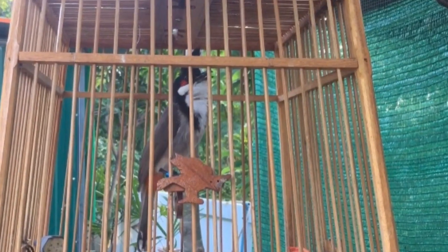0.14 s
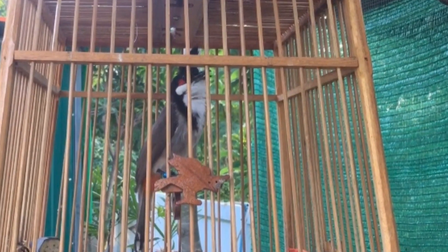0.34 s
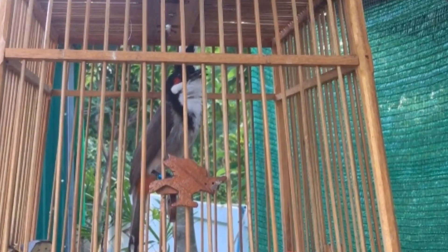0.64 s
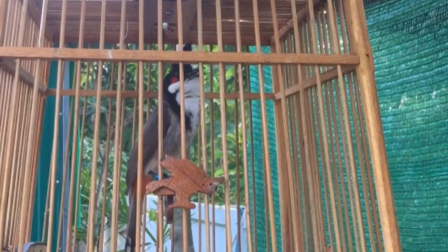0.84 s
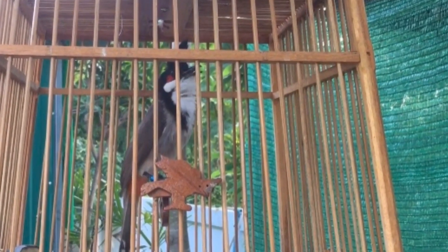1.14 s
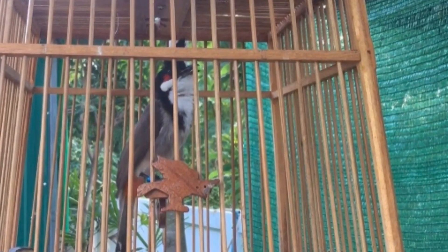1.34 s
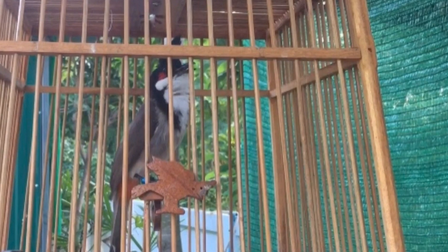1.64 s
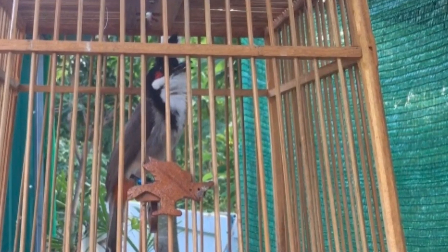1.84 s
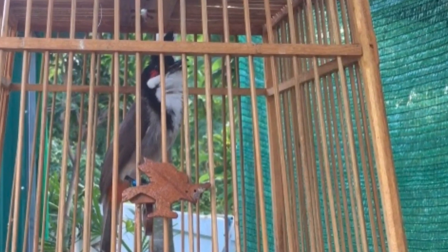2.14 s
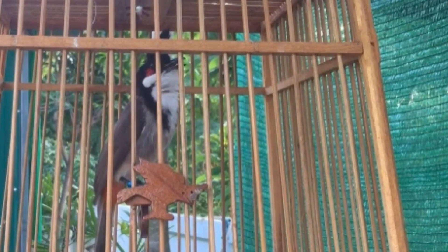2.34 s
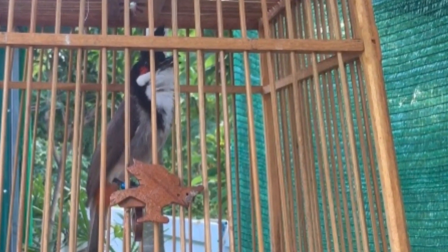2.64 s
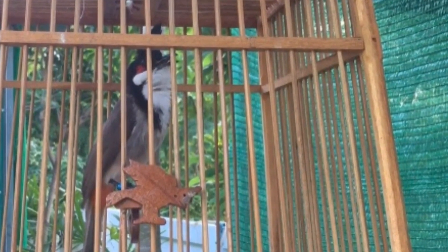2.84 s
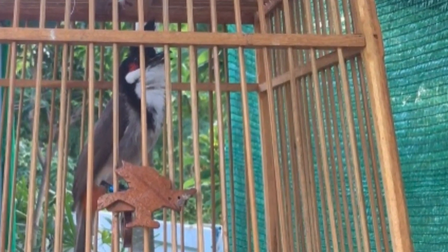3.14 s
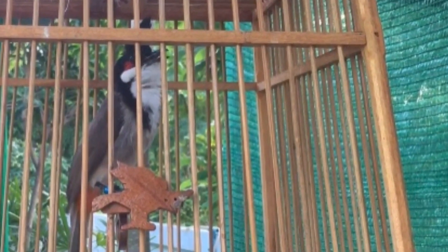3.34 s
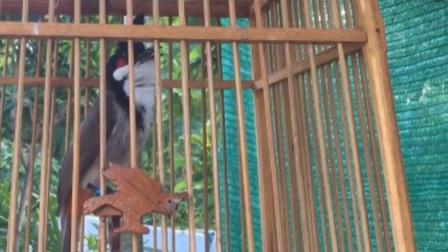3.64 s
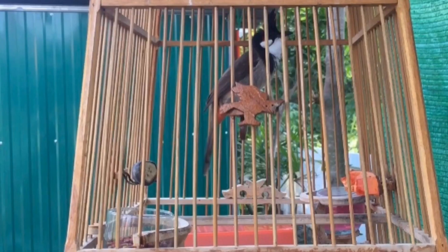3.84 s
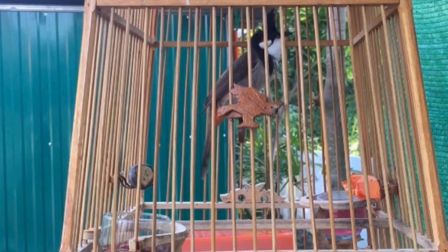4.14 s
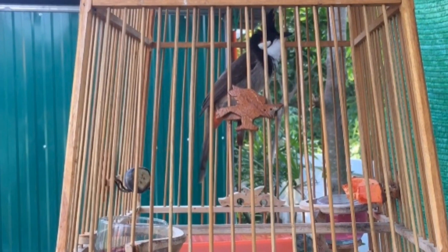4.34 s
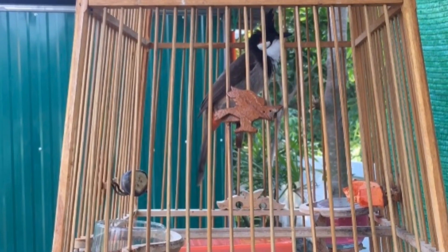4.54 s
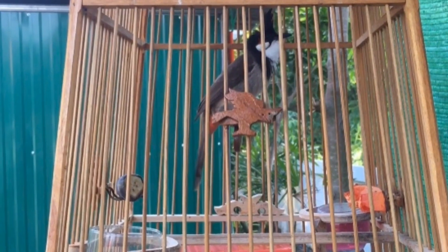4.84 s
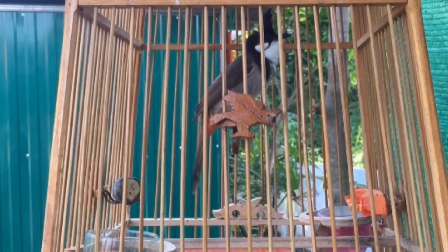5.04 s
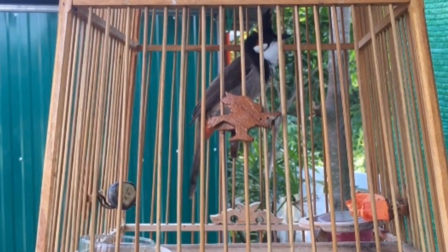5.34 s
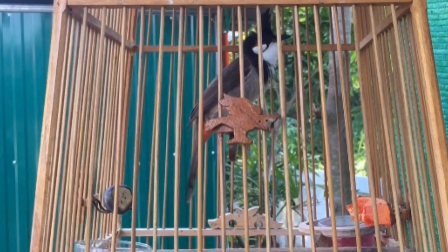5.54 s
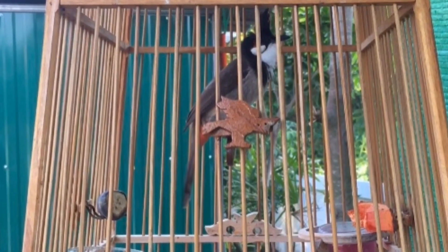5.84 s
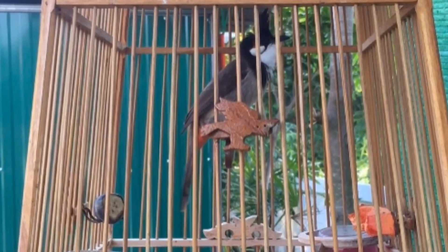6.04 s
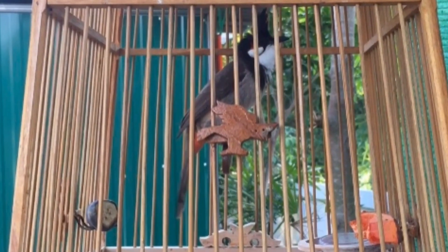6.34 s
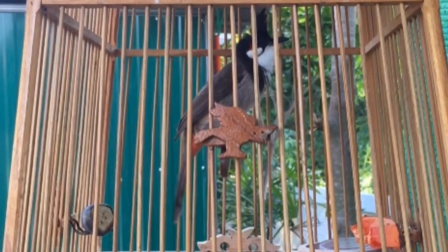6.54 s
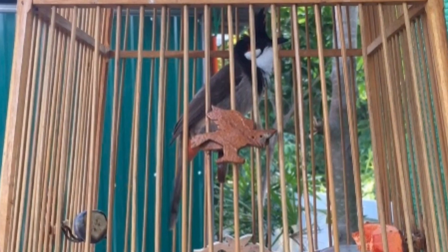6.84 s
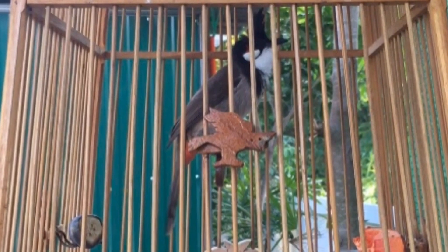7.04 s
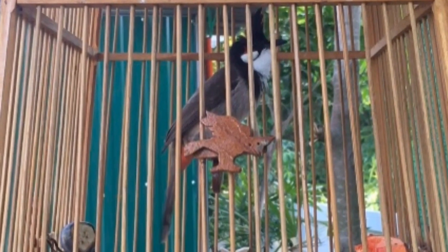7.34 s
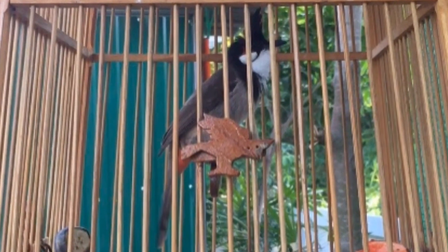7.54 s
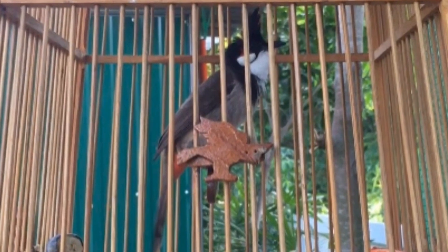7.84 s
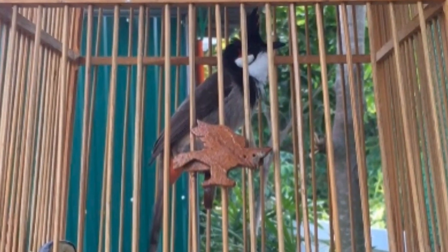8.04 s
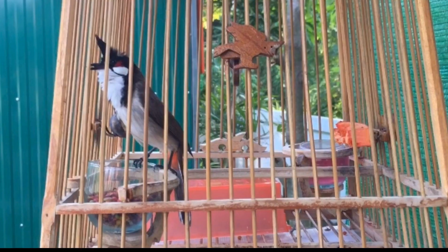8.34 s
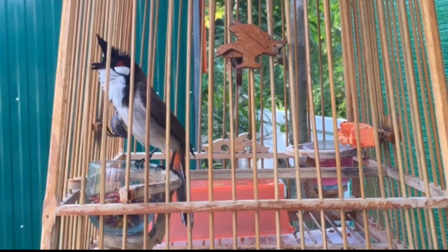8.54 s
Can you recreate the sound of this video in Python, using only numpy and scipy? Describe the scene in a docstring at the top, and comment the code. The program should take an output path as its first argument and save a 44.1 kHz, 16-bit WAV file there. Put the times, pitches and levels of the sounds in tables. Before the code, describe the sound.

A caged songbird very close to the microphone opens with three loud, quick liquid whistles. Three low, wavy, throaty chuckles follow at widely spaced moments, then a longer five-note whistled phrase, and a last chuckle begins right at the end. Tiny bamboo ticks and rustles come from the cage. Other birds reply faintly in the yard, over surging low traffic rumble.

```python
"""A yard where a caged bulbul sings close to the microphone: a low wavy chuckle, given four times, and two
phrases of loud warbled whistles. Whistles are near-pure gliding tones; chuckles are harmonics shaped by a throat.
Cage and yard echo the song, and its loudest notes overload the recorder. One bird answers nearby with trills,
another far off with short glides. The cage ticks (bright snaps over ringing bamboo) and rustles, all in noise.
Distant traffic is surging low noise with a wandering drone, tyre noise and a faint hiss."""
import sys
import numpy as np
from scipy import signal
from scipy.fft import rfft, irfft, next_fast_len
from scipy.io import wavfile
from scipy.ndimage import map_coordinates

SR = 44100
rng = np.random.default_rng(int(sys.argv[2]) if len(sys.argv) > 2 else 0)


def transcribe(signal):
    """Save signal, clipped to [-1, 1], as a 16-bit WAV file at the path in sys.argv[1]."""
    frames = np.atleast_2d(signal).T
    limited = np.clip(frames, -1, 1)
    pcm = np.round(limited * 32767).astype(np.int16)
    wavfile.write(sys.argv[1], SR, pcm)


N = 382347

TOP_HZ = 15750  # nothing sounds above this
ATTACK_S, RELEASE_S = 0.0027, 0.005  # opening and closing of every whistle, chuckle and chip

# The bulbul's five whistles by name, before each note's own gain and pitch ratio:
# (time in note [s], pitch [Hz], level [dB], warble depth [Hz])
WHISTLE_SHAPES = dict( peak=[(0, 1750, -31, -0.5), (.007, 2300, -18, 61), (.013, 3000, -5.5, 379),
                  (.022, 3310, -3, 399.5), (.028, 3417, -0.5, 1.5), (.046, 3260, 2.5, 0),
                  (.054, 3390, -13.5, 449.5), (.063, 3640, 0.5, 220.5), (.076, 3630, -19, 1)],
                  flat=[(0, 3340, -10.5, -0.5), (.006, 2069, -11.5, 0), (.017, 2268, -5, 80),
                  (.036, 2540, -6, 249), (.052, 2660, -5.5, 168.5), (.063, 2480, -3.5, 82)],
                  arch=[(0, 1280, -27, 101), (.018, 1710, -12, 220.5), (.044, 2463, -5, 299),
                  (.060, 2555, -3.5, 301), (.068, 2394, -2, 31), (.084, 2235, -6, 1.5),
                  (.089, 1812, -6.5, 1), (.120, 1881, -13, -1)], buzz=[(0, 1790, -30.5, 300),
                  (.023, 1934, -17, 330), (.038, 2395, -1, 345), (.059, 2720, 3, 280),
                  (.069, 2598, -7.5, 80)], rise=[(0, 1090, -27.5, 0), (.008, 1496, -10.5, 1),
                  (.015, 2250, -9, 0), (.023, 2394, 1, -1), (.031, 2320, 4.5, 30), (.036, 2802, 3.5, 260),
                  (.056, 3327, 4, 89.5), (.079, 3460, 3, 48), (.088, 3026, -5, 0)])
# Its two phrases: (time [s], whistle [name], gain [dB], pitch [ratio], hoarse onset [0-1], warble rate [Hz])
SONG = [(0.0126, "peak", 2, 1.0, .08, 92), (.162, "flat", -1, 1.0, 0.1, 94.9),
        (.277, "arch", -2.5, 1.016, .07, 91.2), (5.863, "buzz", -1.5, 1.052, .8, 104.9),
        (6.173, "rise", -2.5, 1.0132, .09, 94.66), (6.322, "peak", 0.5, 1.0, 0.09, 92.7),
        (6.465, "flat", -1, 0.99, .06, 101.5), (6.582, "arch", -1, 1.022, .07, 96.05)]
# What the throat lets through of overtones and rasp, resonant near 13 kHz: (frequency [Hz], gain [dB])
OVERTONES = [(3300, -25.5), (4300, -31.5), (5400, -28.5), (6200, -32.5), (7300, -32), (8600, -38.5),
             (10400, -48), (11700, -36.5), (13300, -31), (14700, -40), (15700, -36)]
# The chuckle climbs in four arches of pitch and drops at the end, before each one's own gain, pitch and length:
# (time in chuckle [s], pitch [Hz], level [dB])
CHUCKLE_SHAPE = [(0, 1230, -27), (.012, 1360, -14), (.026, 1122, -11.5), (.046, 1564, -10.5),
                 (.067, 1419, -8.5), (.087, 1733, -11.5), (.106, 1590, -10), (.127, 1745, -10),
                 (.151, 1029, -9)]
# Each chuckle: (time [s], gain [dB], overtones [dB], start pitch [ratio], end pitch [ratio],
# length [ratio], pressure [0-1])
CHUCKLES = [(2.213, -0.5, 0, 1.03, 0.97, .945, 0.94), (3.521, -1, 0.5, .955, .99, .955, 1),
            (4.945, -1.5, 1, 1.04, 1.057, 1.06, 1), (8.466, 1.5, -4, .985, .995, 1.0, .35)]
# The throat during a chuckle: (frequency [Hz], gain [dB])
THROAT = [(1000, -20.5), (1300, -11), (1480, -6.5), (1650, 1), (2300, -4), (2900, -7.5), (3200, -20),
          (3500, -23.5), (5000, -38), (7000, -39.5), (10500, -49.5), (13000, -32.5), (16000, -45.5)]
# Husky noise of the chuckle: (frequency [Hz], level [dB])
HUSK = [(1200, -32), (2200, -2.5), (2800, -5), (3600, -10.5), (4300, -37), (5500, -80)]
# Bars, roof and floor of the cage reflect the song: (delay [s], gain [dB])
WALLS = [(.0013, -23.5), (.0029, -17.5), (.0047, -16.5), (.0083, -19)]
# Small knocks on the cage: (time [s], level [dB], extra woody body [dB])
TICKS = [(0.5399, -38, 3), (0.8712, -42, 2), (1.7774, -35, 12), (1.9595, -41.5, 10), (2.6563, -41.5, 11.5),
         (5.697, -37, -12.5), (5.7569, -40.5, -3.5), (6.0366, -34.5, -23), (7.099, -43.5, -4),
         (7.3432, -33.5, 8), (7.4025, -40, -10.5)]
# Colour of snaps and rustles: (frequency [Hz], level [dB])
TICK_COLOUR = [(1500, -6), (3500, 2.5), (6000, -9), (10000, -8), (15000, -4)]
# Ringing modes of the bamboo: (centre [Hz], width [Hz], gain [dB])
BAMBOO = [(950, 260, 3), (1810, 860, -8), (2806, 600, -15.5)]
# Echo decay in the cage: (frequency [Hz], time to fall 60 dB [s])
CAGE_DECAY = [(500, 0.19), (3000, 0.17), (7000, 0.072), (14000, 0.033)]
# Echo decay in the yard: (frequency [Hz], time to fall 60 dB [s])
YARD_DECAY = [(500, 0.18), (2500, 0.68), (4000, 0.49), (7000, .4), (14000, 0.39)]
# Colour of both echoes: (frequency [Hz], gain [dB])
ECHO_COLOUR = [(1000, 0.5), (1650, -1), (1880, 4), (2150, 1), (2500, -2), (4000, -3.5), (6000, 0),
               (14000, -4.5)]
# The neighbour's chip, a rising trill then a downward flick, before each chip's own gain and pitch ratio:
# (time in chip [s], pitch [Hz], level [dB], warble depth [Hz])
CHIP_SHAPE = [(0, 2693, -22, 57), (.018, 2920, -18, 191), (.045, 3427, -14.5, 300),
              (.072, 3905, -19.5, 372), (.088, 3900, -24.5, 244), (.113, 3150, -23, 0),
              (.120, 2496, -20, 4), (.138, 1361, -31, 4)]
# Its chips: (time [s], gain [dB], pitch [ratio])
CHIPS = [(2.403, -4, 1.058), (4.985, -5.5, .93), (7.987, -7.5, .97)]
# The far bird's motifs by name, before each call's own gain and pitch ratio:
# (time in motif [s], pitch [Hz], glide [octaves], level [dB])
FAR_MOTIFS = dict( climb=[(0, 2567, 0.18, -5), (.035, 3265, 0.092, -8.5), (.075, 3530, .02, 2.5)],
              turn=[(0, 2374, -.04, -1), (.1, 3210, 0.045, -2), (.21, 2920, -.03, 0.5)],
              pair=[(0, 2435, -0.037, -1), (.135, 2822, .02, -1.5)], fall=[(0.0049, 2900, -0.19, -4)])
# Its calls: (time [s], motif [name], gain [dB], pitch [ratio])
FAR_CALLS = [(.915, "climb", -38.5, 1.01), (1.39, "climb", -35, .98), (1.645, "pair", -47, 1.0),
             (3.0, "climb", -56.5, .92), (3.235, "turn", -47.5, .99), (5.16, "climb", -38.5, 1.047),
             (5.305, "pair", -46.5, 1.0), (7.085, "turn", -48.5, 1.0), (7.69, "climb", -35.5, 1.01),
             (8.35, "fall", -46, 1.0)]
# Course of the traffic, before the rumble's trim and surges: (time [s], level [dB])
TRAFFIC = [(0.02, -37), (0.26, -30), (0.38, -32.5), (1.339, -23.9), (1.42, -18.5), (1.78, -23.5),
           (2.94, -19), (3.78, -26), (4.14, -15), (4.38, -22), (4.54, -16.5), (4.74, -24.5), (4.82, -19),
           (5.18, -29), (5.3, -22.9), (6.38, -25), (6.7, -20.5), (8.62, -25.5)]
# Spectrum of the engine rumble: (frequency [Hz], relative density [dB per Hz])
RUMBLE = [(20, -34), (31, -23.5), (40, -9), (60, -2.5), (85, -2), (105, 1.5), (160, -7), (220, -12),
          (320, -28.5), (500, -79)]
# Spectrum of the tyre noise: (frequency [Hz], relative density [dB per Hz])
TYRES = [(110, -32.5), (180, -2.5), (317, -1.5), (367, -7), (387, -9.5), (467, -15.5), (576, -15),
         (725, -22.5), (1000, -26.5), (1560, -41), (2200, -58.5), (2860, -78.5), (4840, -120)]
# Spectrum of the steady hiss: (frequency [Hz], relative density [dB per Hz])
HISS = [(900, -17), (1800, 4.5), (3000, -3.5), (3800, -3.5), (4400, -7), (5100, -10.5), (5700, -6.5),
        (6600, -14), (9300, -14), (11000, -18), (15500, -22)]
# Response of the microphone: (frequency [Hz], gain [dB])
MICROPHONE = [(3300, 0), (3900, 2.5), (4600, -3.5), (5600, 1)]


def whistles(rasp_db=-40):
    """Nearly pure tones; the throat colours their faint overtones and rasp."""
    out = np.zeros(N)
    for s, name, gain_db, ratio, hoarse, warble_hz in SONG:
        phase, hz, level = voice(WHISTLE_SHAPES[name], ratio, hoarse, warble_hz)
        tone = np.sin(phase)
        for k in range(2, 10):
            audible = k * hz < TOP_HZ
            tone += amp(along(OVERTONES, k * hz)) * np.sin(k * phase) * audible
        rasp = amp(rasp_db) * noise(OVERTONES, len(phase))
        add(out, s, amp(gain_db) * level * (tone + rasp))
    return out


def chuckles(doubling_db=-12, rasp_db=-43, husk_db=-27, flutter_db=2.0):
    """A rough, harmonic-rich voice in a fixed throat: the octave leads at low pitch, the fundamental at high."""
    press_s, press_width_s = 0.052, 0.024
    octave_db, press_db, slack_db = 4, 8, -12  # pressed 2nd harmonic, pressed 3rd to 6th, slack dulling
    out = np.zeros(N)
    for s, gain_db, overtones_db, first_ratio, last_ratio, stretch, pressure in CHUCKLES:
        t, hz, db = gesture(CHUCKLE_SHAPE, stretch)
        hz = hz * np.linspace(first_ratio, last_ratio, len(t))
        phase = phase_of(hz * (1 + 0.011 * wobble(1100, len(t))))
        # The second arch is pressed: it brightens, and its period doubles,
        # adding a line between the first two harmonics.
        pressed = pressure * np.exp(-((t - press_s) / press_width_s) ** 2)
        slack = np.interp(hz, [1180, 1400], [1, 0])  # at the bottom of its range the voice turns dull
        tone = amp(doubling_db) * pressed * np.sin(3 * phase / 2)
        for k in range(1, 14):
            bright_db = pressed * (octave_db * (k == 2) + press_db * (2 < k < 7))
            dull_db = slack_db * slack * (k > 3)
            harmonic_db = along(THROAT, k * hz) + bright_db + dull_db + overtones_db * (k > 1)
            audible = k * hz < TOP_HZ
            tone += amp(harmonic_db) * np.sin(k * phase) * audible
        pulse = 1 + np.cos(phase)  # the rasp swells once per cycle
        rasp = amp(rasp_db + slack_db * slack) * noise(OVERTONES, len(t)) * pulse
        husk = amp(husk_db + overtones_db) * pressure * noise(HUSK, len(t))
        level = amp(gain_db + db + flutter_db * wobble(200, len(t))) * gate(t)
        add(out, s, (tone + rasp + husk) * level)
    return out


def voice(shape, ratio, hoarse, warble_hz, cusp=0.3, jitter=0.012, flutter_db=2.0, dip_db=3.0):
    """Phase, pitch and level of a whistle; a fast warble flicks pitch up and dents the level at each flick."""
    t, hz, db, depth = gesture(shape)
    hz = hz * ratio
    turn = phase_of(warble_hz * (1 + 0.047 * wobble(76, len(t))))
    swing = depth * (np.cos(turn) + cusp * np.cos(2 * turn))  # the second term sharpens the upward flick
    # A hoarse note takes a moment to find its pitch.
    unsteady = jitter + hoarse * 0.21 * np.exp(-(t / 0.028) ** 4)
    phase = phase_of((hz + swing) * (1 + unsteady * wobble(1400, len(t))))
    dent_db = dip_db * swing / 300  # dip_db per 300 Hz of swing
    level = amp(db + flutter_db * wobble(250, len(t)) - dent_db)
    return phase, hz, level * gate(t)


def gesture(rows, stretch=1):
    """Time and each column per sample; the muscles ease partly in and out of every row."""
    s, *cols = np.transpose(rows)
    s = np.sort(s - s.min()) * stretch
    t = np.arange(int(s[-1] * SR)) / SR
    index = np.arange(len(s))
    place = np.interp(t, s, index)
    eased = place - np.sin(2 * np.pi * place) / (2 * np.pi) / np.sqrt(2)
    return [t] + [np.interp(eased, index, c) for c in cols]


def gate(t):
    """A note opens and closes smoothly on a squared sine."""
    opening = np.clip(np.minimum(t / ATTACK_S, (t[-1] - t) / RELEASE_S), 0, 1)
    return np.sin(np.pi / 2 * opening) ** 2


def caged(x):
    """Close reflections beat against every fast sweep and make its level flutter."""
    out = x.copy()
    for delay, db in WALLS:
        add(out, delay, amp(db) * x)
    return out


def echo(x, decay):
    """A diffuse tail that builds up softly and in which each frequency dies at its own speed."""
    hz, t, grid = signal.stft(rng.standard_normal(SR), SR, nperseg=256)
    t60 = along(decay, hz)[:, None]
    tail = signal.istft(grid * amp(-60 * t / t60), SR, nperseg=256)[1]
    tail *= 1 - np.exp(-np.arange(len(tail)) / SR / 0.017)  # build-up time constant [s]
    tail /= np.linalg.norm(tail)
    tail = filtered(tail, lambda f: amp(along(ECHO_COLOUR, f)))
    return signal.fftconvolve(x, tail)[:N]


def bamboo_response(hz):
    """Resonances of the bamboo, summed with alternating sign."""
    total = 0
    for k, (centre, width, db) in enumerate(BAMBOO):
        damping = 1j * hz * width
        total = total + (-1) ** k * amp(db) * damping / (centre ** 2 - hz ** 2 + damping)
    return total


def ticks(snap_db=-9, body_db=-7):
    """Each knock is a bright snap of noise and a short ring of the bamboo."""
    snap_t60, body_t60 = 0.085, 0.13  # time to fall 60 dB [s]
    out, t = np.zeros(N), np.arange(SR // 5) / SR
    for s, db, woody_db in TICKS:
        snap = noise(TICK_COLOUR, len(t)) * amp(snap_db - 60 * t / snap_t60)
        ring = unit(filtered(rng.standard_normal(len(t)), bamboo_response))
        body = ring * amp(body_db + woody_db - 60 * t / body_t60)
        add(out, s, amp(db) * (snap + body))
    return out


def fidgets(rate=7, size_db=-60, t60=0.077):
    """Tiny rustles of claws and feathers: decaying noise bursts at random times, rate of them a second."""
    out, t = np.zeros(N), np.arange(SR // 10) / SR
    for when, size in rng.random((int(rate * N / SR), 2)):
        extra_db = -4 * np.log(1 - 0.35 * size)  # 0 to 1.7 dB
        rustle = noise(TICK_COLOUR, len(t)) * amp(size_db + extra_db - 60 * t / t60)
        add(out, when * N / SR, rustle)
    return out


def neighbour(direct_db=-2, walls_db=-8, yard_db=-14):
    """A second bird nearby gives pure, pulsing rising trills that end in a downward flick."""
    out = np.zeros(N)
    for s, gain_db, ratio in CHIPS:
        phase, _, level = voice(CHIP_SHAPE, ratio, 0, warble_hz=131.5, dip_db=6.5)
        add(out, s, amp(gain_db) * level * np.sin(phase))
    echoes = amp(walls_db) * echo(out, CAGE_DECAY) + amp(yard_db) * echo(out, YARD_DECAY)
    return amp(direct_db) * caged(out) + echoes


def far_bird(direct_db=-7, walls_db=-8, yard_db=-2, note_s=0.1):
    """Motifs of short wavering glides that swell softly, heard mostly by their echoes."""
    out, size = np.zeros(N), int(note_s * SR)
    for s, name, call_db, ratio in FAR_CALLS:
        for delay, pitch_hz, glide, db in FAR_MOTIFS[name]:
            waver = 1 + 0.027 * wobble(400, size)
            sweep = 2 ** (glide * np.linspace(-0.5, 0.5, size))
            tone = np.sin(phase_of(ratio * pitch_hz * sweep * waver))
            add(out, s + delay, amp(call_db + db) * signal.windows.hann(size) * tone)
    echoes = amp(walls_db) * echo(out, CAGE_DECAY) + amp(yard_db) * echo(out, YARD_DECAY)
    return amp(direct_db) * out + echoes


def traffic(rumble_db=-1.0, surge_db=1.73, drone_hz=100, drone_db=-11, tyres_db=-31, swell_db=1.66, hiss_db=-58):
    """Surging engine rumble with a wandering drone, tyre noise that rises with it, and a faint steady hiss."""
    usual_db, tyres_grow = -23, 1.1  # traffic level that gives tyres_db; tyre dB gained per traffic dB
    level_db = np.interp(np.arange(N) / SR, *np.transpose(TRAFFIC))
    drone_phase = phase_of(drone_hz * (1 + 0.05 * wobble(10, N)))
    drone = amp(drone_db) * np.sin(drone_phase) * amp(wobble(5, N))  # level wanders by about 1 dB
    rumble = (noise(RUMBLE) + drone) * amp(level_db + rumble_db + surge_db * wobble(6.6, N))
    tyres_level_db = tyres_db + tyres_grow * (level_db - usual_db)
    tyres = noise(TYRES) * amp(tyres_level_db + swell_db * wobble(9, N))
    return rumble + tyres + amp(hiss_db) * noise(HISS)


def amp(db):
    """Decibels to gain."""
    return 10 ** (np.asarray(db) / 20)


def unit(x):
    """Scale to rms 1."""
    return x / np.sqrt(np.mean(x ** 2) + 1e-20)


def along(points, hz):
    """Read (frequency [Hz], value) points on a log frequency axis."""
    f, v = np.transpose(points)
    return np.interp(np.log(hz + 1), np.log(f + 1), v)


def wobble(rate, size):
    """A smooth random curve, rate knots a second."""
    knots = rng.standard_normal(int(size * rate / SR) + 4)
    return map_coordinates(knots, [np.arange(size) * rate / SR])


def filtered(x, response):
    """Shape the spectrum of x by a response of frequency."""
    m = next_fast_len(len(x) + 8192)
    return irfft(rfft(x, m) * response(np.fft.rfftfreq(m, 1 / SR)), m)[:len(x)]


def noise(spectrum, size=N):
    """Coloured noise of rms 1."""
    return unit(filtered(rng.standard_normal(size), lambda hz: amp(along(spectrum, hz))))


def add(track, s, sound):
    """Mix a sound into a track at time s."""
    part = track[max(round(s * SR), 0):][:len(sound)]
    part += sound[:len(part)]


def phase_of(hz):
    """Running phase of a pitch curve."""
    return 2 * np.pi * np.cumsum(hz) / SR


def scene(cage_db=-20, yard_db=-27):
    """The near bird and its cage, with the echoes of cage and yard, over the background."""
    near = caged(whistles() + chuckles()) + ticks() + fidgets()
    echoes = amp(cage_db) * echo(near, CAGE_DECAY) + amp(yard_db) * echo(near, YARD_DECAY)
    return (near + echoes + neighbour() + far_bird() + traffic())[None]


def record(dry, ceiling=1.03, hardness=7):
    """The microphone colours the sound, overload rounds off the loudest whistles, and the top is cut."""
    heard = filtered(dry[0], lambda hz: amp(along(MICROPHONE, hz)))
    rounded = heard / (1 + np.abs(heard / ceiling) ** hardness) ** (1 / hardness)
    return filtered(rounded, lambda hz: hz < TOP_HZ)[None]


dry = scene()
out = record(dry)
transcribe(out)
```